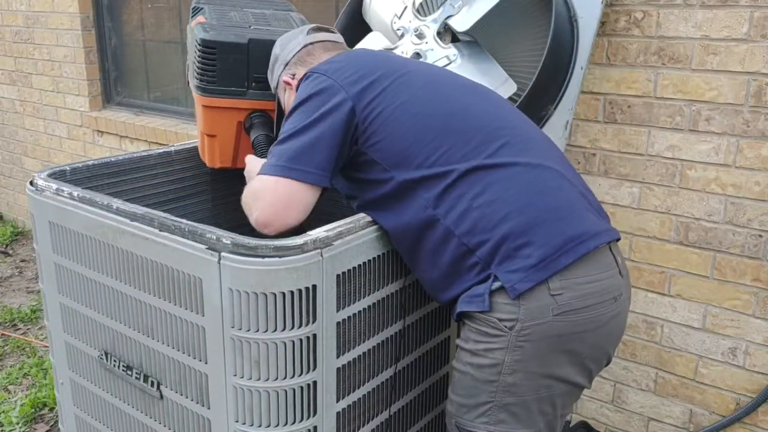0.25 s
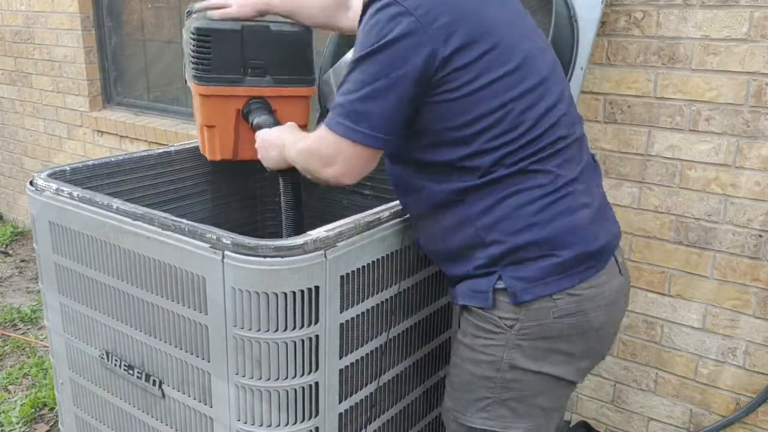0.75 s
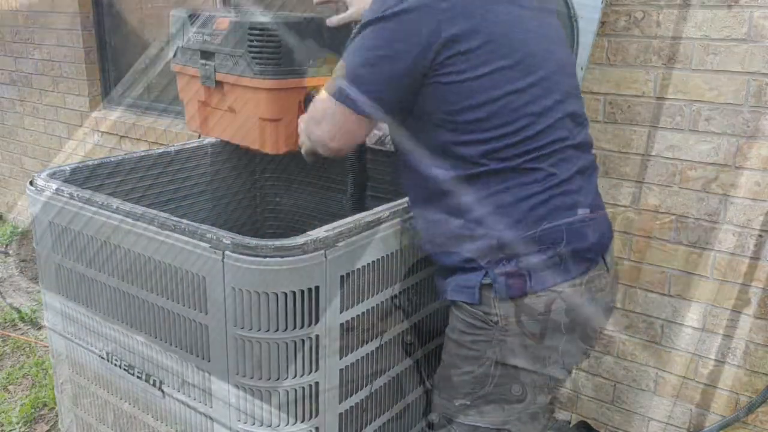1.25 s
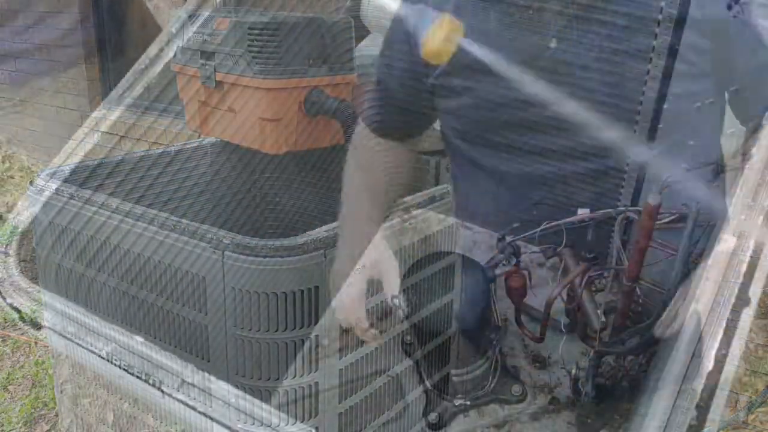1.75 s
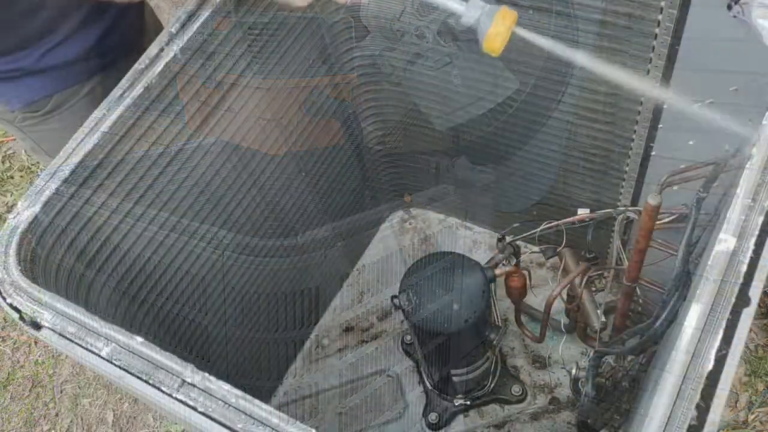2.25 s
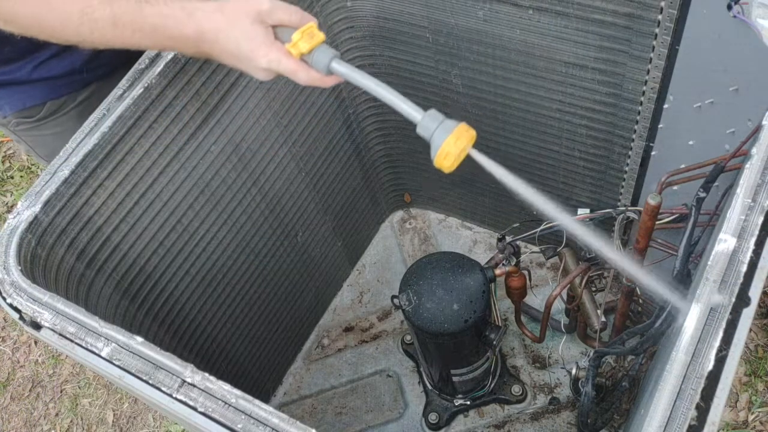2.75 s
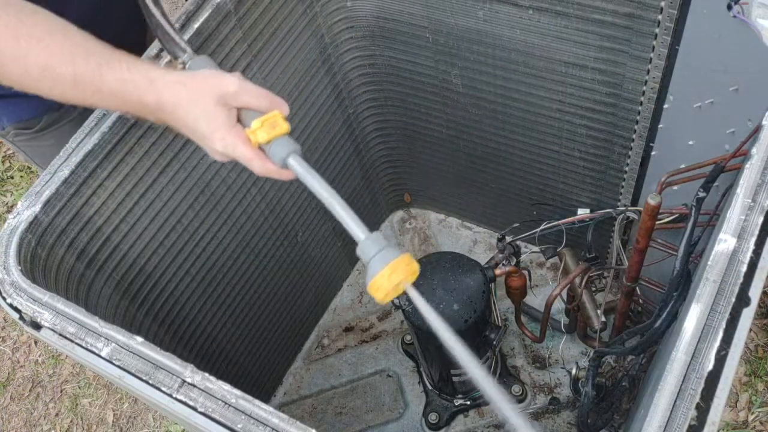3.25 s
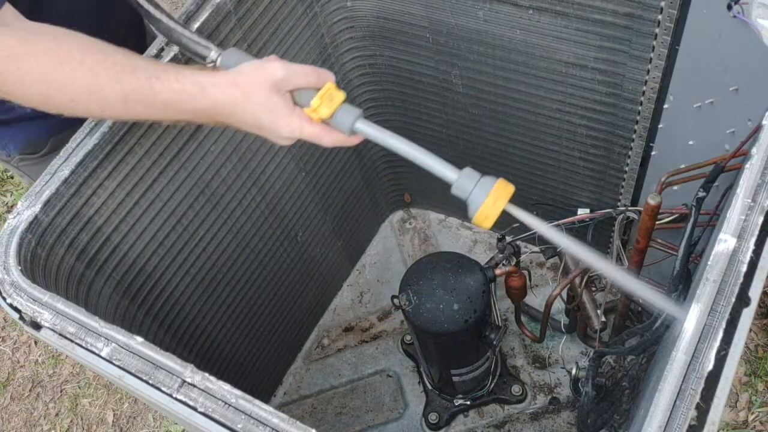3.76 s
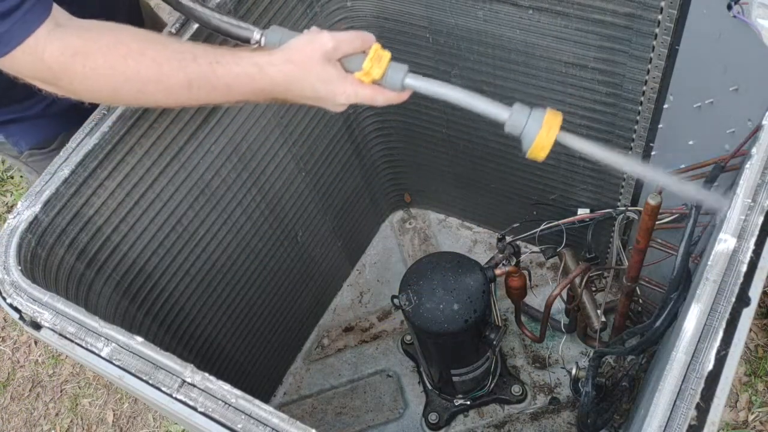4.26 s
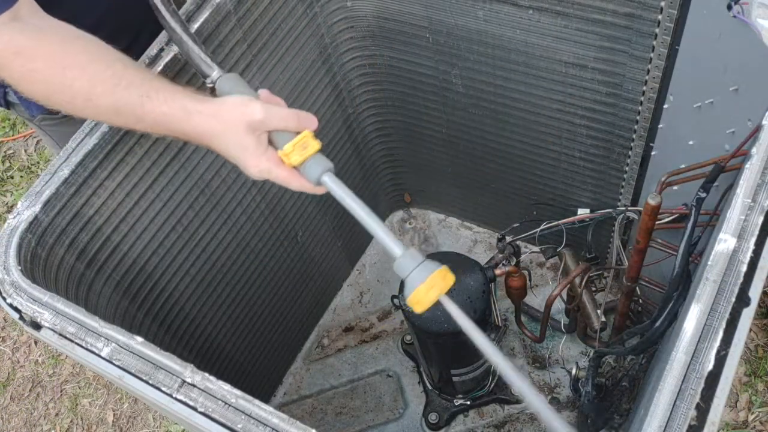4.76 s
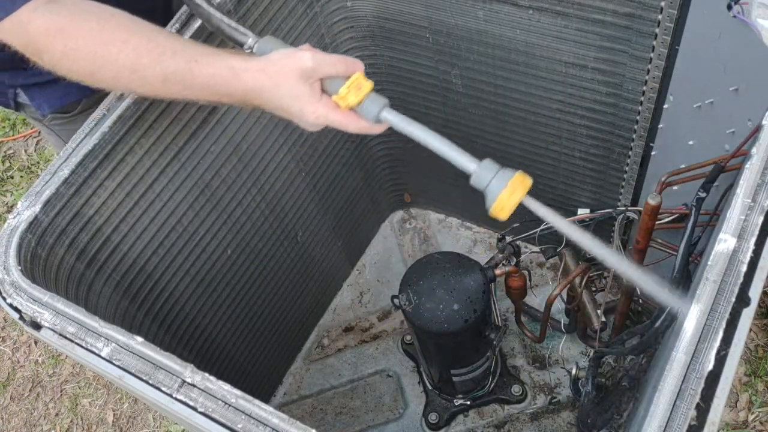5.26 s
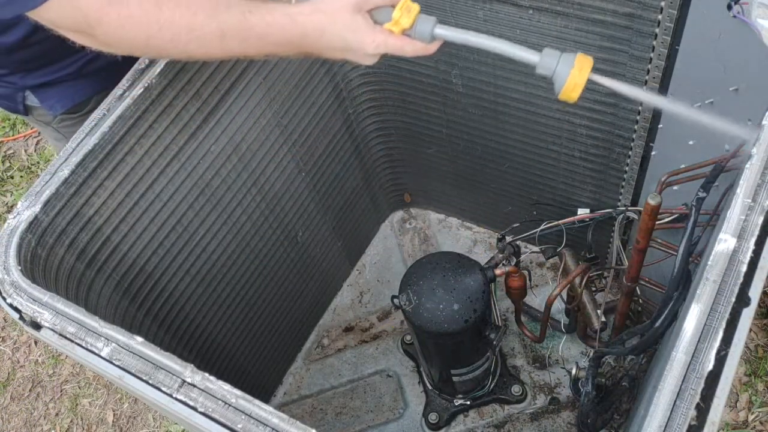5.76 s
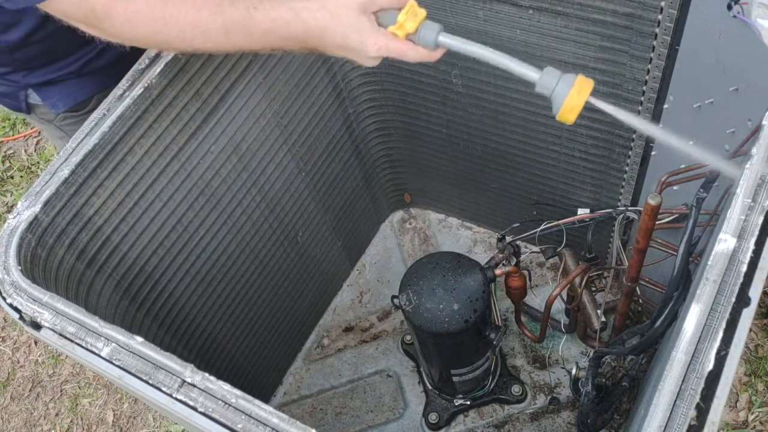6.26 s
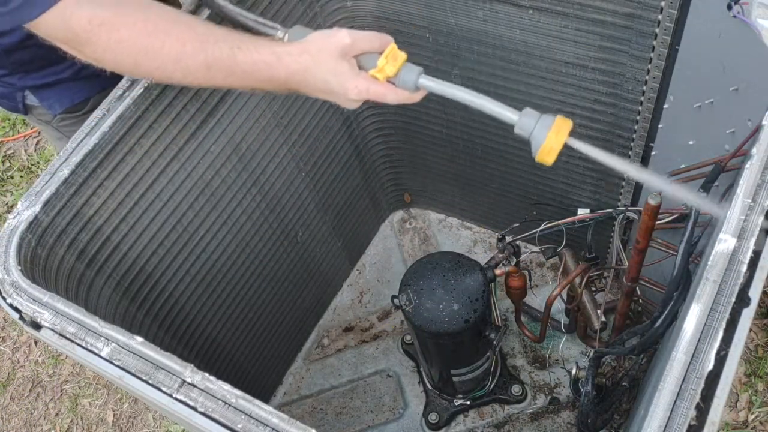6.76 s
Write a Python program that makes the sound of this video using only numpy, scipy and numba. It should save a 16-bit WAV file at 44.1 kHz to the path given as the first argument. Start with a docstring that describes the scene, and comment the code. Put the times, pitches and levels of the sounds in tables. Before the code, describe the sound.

Outdoors, a close, bright hiss of water begins abruptly as a hose jet hits an air conditioner's coil. After two short early dips, the spray runs on with gentle rises and falls, mixing fine sizzle, splatter and a light metallic ring from the fins over water pouring against the cabinet. Far behind are a faint machine hum, low traffic and two distant engines.

```python
"""A hiss of water bursts in as a hose wand sweeps its jet over an outdoor air conditioner's coil.
Thousands of drops a second patter on the coil, ring its thin metal fins and sizzle between them.
The water also splatters off the frame and drums on the cabinet; twice the jet briefly slips off.
Behind it are two distant engines, a faint machine hum and the rumble of traffic."""
import sys
import numpy as np
from scipy import signal
from scipy.fft import rfft, irfft
from scipy.io import wavfile
from scipy.ndimage import map_coordinates
from numba import njit

SR = 44100
rng = np.random.default_rng(int(sys.argv[2]) if len(sys.argv) > 2 else 0)


def waveform_to_disk(signal):
    """Save audio, clipped to [-1, 1], as 16-bit WAV at the path in sys.argv[1]."""
    frames = np.transpose(np.atleast_2d(signal))
    scaled = np.clip(frames, -1, 1) * 32767
    samples = np.round(scaled).astype(np.int16)
    wavfile.write(sys.argv[1], SR, samples)


N = 308700
T = np.arange(N) / SR
START_S, RISE_S = .563, .016  # when the sound starts, and how long it takes to come in
USUAL_AIM_DB = -31

# how squarely the sweeping jet meets the coil: (time [s], relative level [dB])
SWEEP = [(.57, -28), (.78, -26.5), (1.05, -30), (1.3, -29), (1.8, -32), (2.35, -27.5), (2.66, -26.5),
         (2.75, -29.5), (3.45, -35), (3.65, -30.5), (3.79, -33.5), (4.28, -25), (4.56, -32.5),
         (4.98, -33.5), (5.15, -35), (5.8, -33), (6.1, -30.5), (7, -30.5)]
# the jet slips off the coil: (leaves [s], fully back [s], loss [dB])
JET_MISSES = [(0.822, 1.052, 21), (1.154, 1.283, 8)]
# the jet splatters across the frame or a pipe: (time [s], half length [s], level [dB])
FRAME_HITS = [(0.773, .08, -36), (1.31, 0.083, -33.5), (1.488, 0.047, -29), (1.693, 0.079, -35.5),
              (2.29, 0.1, -34), (2.66, 0.057, -31), (3.599, 0.13, -31), (5.325, 0.19, -35.5),
              (6.674, 0.14, -35), (6.847, 0.094, -32.5)]
# the tone colours of four water sounds: (frequency [Hz], relative level [dB])
SIZZLE_COLOUR = [(100, -61), (3000, -30), (4800, -7.5), (5900, -1.5), (6900, -0.5), (7700, 1), (8500, 4),
                 (9300, -12.5), (10500, -12.5), (14000, -30)]
SPLATTER_COLOUR = [(60, -58), (700, -18.5), (1500, -9.5), (2500, 0.5), (3400, -2.5), (4300, 0), (5100, -4),
                   (6500, -5.5), (9000, -42), (15000, -35)]
MIST_COLOUR = [(6000, -19), (9000, 6), (10400, 2), (11500, -2), (13000, -10), (15500, -20.5)]
WASH_COLOUR = [(40, -52), (120, -23.5), (220, -13), (290, -3), (370, -8.5), (600, -2.5), (950, -1),
               (1500, -0.5), (2400, -8), (4000, -9.5), (9000, -26)]
# the jet rests on loose fins: (start [s], end [s], pitch [Hz], first level [dB], last level [dB])
LOOSE_PATCHES = [(0.54, 0.82, 2125, -30.5, -28), (1.05, 1.141, 2230, -32.5, -31),
                 (1.263, 1.604, 1990, -39.5, -38), (1.77, 2.3, 2056, -36.5, -38),
                 (2.3, 2.687, 2045, -33, -29), (2.93, 3.337, 1965, -35, -42),
                 (3.434, 4.1, 1994, -39, -34.5), (4.115, 4.3, 2006, -35.5, -31.5),
                 (4.51, 4.86, 1980, -32, -39.5), (4.944, 5.016, 2150, -35, -37.5),
                 (5.053, 5.144, 1860, -38, -37.5), (5.485, 5.542, 1800, -35, -35),
                 (5.773, 6.614, 1990, -41.5, -36.5), (6.66, 7, 1940, -33.5, -36)]
# the notes of the fins and the cabinet panels: (pitch [Hz], width [Hz], relative level [dB])
FIN_NOTES = [(1616, 31, 5.5), (1810, 41, 3), (1888, 16, -0.5), (1937, 20, 2), (2013, 21, -1.5),
             (2110, 32, -1.5), (2183, 37, 2), (2203, 78, 3.5), (2360, 140, 6.5), (2500, 31, 0.5)]
PANEL_NOTES = [(220, 6, -10), (257.3, 5, -2.5), (294.4, 7.5, 1), (318, 6.7, 6.5), (392.2, 8, 1),
               (429.3, 6.5, 4), (497, 29, 2.5), (596, 16, 0), (674, 17, -4), (810, 37, 1.5)]
# how hard water drums on the panels: (time [s], level compared with the pouring water [dB])
PANEL_LEVEL = [(.6, -13.5), (1.15, -6.5), (2.45, -9.5), (2.85, -11.5), (3.3, -9.5), (4.1, -16.5),
               (5.2, -10.5), (6.2, -10), (7, -16.5)]
# a dip slides through the hiss as the wand moves: (time [s], frequency [Hz], depth [0-1])
HOLLOW_PATH = [(1.6, 3700, 0.16), (1.9, 3800, 0.47), (2.3, 4600, .45), (2.5, 4500, 0), (5.4, 3400, 0.2),
               (5.7, 3480, 0.4), (6.6, 4340, 0.43), (6.8, 4630, 0.45)]
# a distant engine speeds up: (time [s], pitch [Hz], relative level [dB])
ENGINE_DRONE = [(.57, 87, -54), (1.0, 86.5, -47.5), (1.35, 87.5, -52), (1.7, 94, -48.5), (2.08, 99.5, -49),
                (2.27, 100, -66), (3.3, 101, -77), (3.9, 102, -56), (4.8, 102, -59), (6.1, 102, -57),
                (7, 102, -62)]
# a machine hums: (time [s], level [dB])
HUM_LEVEL = [(.6, -59), (1.7, -61), (2.3, -77), (7, -67)]
# how loud the traffic is: (time [s], level [dB])
TRAFFIC_LEVEL = [(.6, -56), (1.8, -55.5), (2.5, -62.5), (3.4, -57.5), (3.9, -53), (4.5, -59.5), (7, -51.5)]
# the tone colour of the traffic: (frequency [Hz], relative level [dB])
TRAFFIC_COLOUR = [(25, -42), (42, -38), (60, -18), (74, -13), (90, 1.5), (112, 5), (124, 1.5), (138, -6.5),
                  (200, -9.5), (400, -28)]
# brief whistles, bursts of misty hiss and one lingering fin:
# (time [s], half length [s], pitch [Hz], width [Hz], relative level [dB])
BRIEF_FLARES = [(0.77, 0.093, 3610, 50, -36.5), (0.816, 0.26, 805, 550, -43), (0.896, .16, 2194, 60, -47),
                (2.385, 0.18, 7600, 900, -29), (2.63, 0.26, 4340, 750, -34),
                (2.656, 0.097, 8600, 3000, -27), (2.835, .04, 8500, 3500, -28),
                (2.8, .25, 11400, 3500, -42), (2.85, 0.23, 9400, 650, -37), (4.02, 0.15, 7760, 1200, -28.5),
                (4.077, 0.41, 4380, 400, -45), (4.14, 0.13, 10600, 450, -41), (4.28, 0.16, 9170, 1410, -28),
                (4.33, 0.1, 13200, 3000, -41), (4.964, .22, 6280, 500, -35.5),
                (5.394, 0.083, 1160, 550, -37), (5.333, 0.23, 3400, 900, -39.5),
                (5.7, 0.13, 1280, 300, -42), (6.45, 0.41, 2600, 700, -39.5), (6.91, 0.094, 10450, 500, -38)]
# a second engine goes by far off: (time [s], pitch [Hz], level [dB])
PASSING_DRONE = [(5.1, 101, -94), (5.6, 98.7, -60.5), (6.2, 96.1, -49.5), (6.6, 95.8, -53.5),
                 (7, 95.6, -66)]


def undb(db):
    """Turn decibels into a number to multiply by."""
    return 10 ** (np.asarray(db) / 20)


def unit(x):
    """Scale x to an average strength (rms) of 1."""
    return x / np.sqrt(np.mean(x ** 2))


def curves(table):
    """Join each column of a timed table with straight lines."""
    times, *columns = np.transpose(table)
    return [np.interp(T, times, column) for column in columns]


def wander(rate):
    """A smooth random wobble of strength 1 that changes about rate times a second."""
    points = rng.standard_normal(1024)
    times = T[::32]
    smooth = map_coordinates(points, [times * rate], order=2, mode="wrap")
    return unit(np.interp(T, times, smooth))


def colour(x, spectrum):
    """Give x the tone colour in a table, at strength 1."""
    hz, db = np.transpose(spectrum)
    bin_hz = np.maximum(np.arange(N // 2 + 1) * SR / N, 1)
    gain = undb(np.interp(np.log(bin_hz), np.log(hz), db))
    return unit(irfft(rfft(x) * gain, N))


@njit
def band_pass(x, hz, width):
    """Keep a band of frequencies around hz, which may move."""
    y, band, low = np.empty(len(x)), 0., 0.
    for i in range(len(x)):
        tuning, damping = np.tan(np.pi * hz[i] / SR), width / hz[i]
        swing = (band + tuning * (x[i] - low)) / (1 + tuning * (tuning + damping))
        band, low = 2 * swing - band, low + 2 * tuning * swing
        y[i] = damping * swing
    return y


def resonate(x, hz, width):
    """Let x ring one note, at strength 1; a narrow width rings longer."""
    return unit(band_pass(x, hz * np.ones(N), float(width)))


def drops(per_second, scatter_db):
    """Drops land at random moments, a few much harder than the rest."""
    lands = rng.random(N) < per_second / SR
    return unit(lands * rng.standard_normal(N) * undb(scatter_db * rng.standard_normal(N)))


def jet_force(shake_start_s=5.82, shake_period_s=0.193, shake_db=2.5, unsteady_db=0.44):
    """The jet's force in dB above the usual: a slow sweep, a wrist shake and an unsteady hand."""
    sweep_db, = curves(SWEEP)
    turns = (T - shake_start_s) / shake_period_s
    shake = -np.cos(2 * np.pi * turns) * np.clip(2 * turns + 1, 0, 1)
    return sweep_db - USUAL_AIM_DB + shake_db * shake + unsteady_db * wander(10)


def miss_loss(fade_s, return_s=0.052):
    """The dB lost when the jet slips off: a sound falls 20 dB per fade_s, then returns with the jet."""
    loss = np.zeros(N)
    for leaves, back, depth_db in JET_MISSES:
        falling = 20 * (T - leaves) / fade_s
        returning = depth_db * (back - T) / return_s
        loss += np.clip(np.minimum(falling, returning), 0, depth_db)
    return loss


def sizzle(force_db, usual_hz=7530, hz_per_db=40, broad_db=-2):
    """Drops burst between the fins; a stronger jet sizzles louder and higher."""
    hz = usual_hz + hz_per_db * force_db
    narrow = resonate(resonate(drops(20000, 1.0), hz, width=1250), hz, width=3700)
    broad = colour(drops(20000, 1.1), SIZZLE_COLOUR) * undb(broad_db)
    level_db = USUAL_AIM_DB + force_db + 0.77 + 0.53 * wander(45)
    return unit(narrow + broad) * undb(level_db)


def fin_patches(attack_s=0.024, fade_s=0.079, stiff_hz=1980, stiff_db=-44.5):
    """Level and pitch of the fins: loose patches ring out, stiff fins weakly; the loudest sets pitch."""
    power = undb(stiff_db - 0.9 * miss_loss(fade_s)) ** 2
    weighted_hz = power * stiff_hz
    for start, end, hz, first_db, last_db in LOOSE_PATCHES:
        held_db = np.interp(T, [start, end], [first_db, last_db])
        faded_db = 20 * np.maximum(T - end, 0) / fade_s
        gain = np.clip((T - start) / attack_s, 0, 1) * undb(held_db - faded_db)
        power += gain ** 2
        weighted_hz += hz * gain ** 2
    return np.sqrt(power), weighted_hz / power


def fins(flutter_db=0.3, rattle_db=-10, hop_db=0.56):
    """Drops ring the fins; the jet hops from fin to fin, so each note flutters in level."""
    gain, patch_hz = fin_patches()
    ring = unit(sum(resonate(drops(6000, 3.3), hz, width) * undb(db + flutter_db * wander(35))
                    for hz, width, db in FIN_NOTES))
    rattle = resonate(drops(5000, 1.1), patch_hz, width=440) * undb(rattle_db)
    # only the fins under the jet sound strongly
    return resonate(ring + rattle, patch_hz, width=190) * gain * undb(hop_db * wander(12))


def spray(force_db, clump_db=0.65):
    """The jet breaks into clumps of drops that sizzle, ring the fins and splatter off the frame."""
    clumps = undb(clump_db * wander(90))
    on_coil = undb(-38 + 0.52 * force_db)
    on_frame = sum(undb(db) * swell(time, half_length) for time, half_length, db in FRAME_HITS)
    sizzling = sizzle(force_db)
    splatter = colour(drops(14000, 1.1), SPLATTER_COLOUR) * np.hypot(on_coil, on_frame)
    mist = colour(drops(25000, 2.8), MIST_COLOUR) * undb(-43.5 + 0.81 * force_db)
    hiss = (sizzling + splatter + mist) * undb(-miss_loss(fade_s=0.053))
    return (hiss + fins()) * clumps


def wash(force_db, swirl_db=1.43, drain_s=0.26, first_rush_db=2.0, settle_s=1.):
    """Water pours through the coil and drums on the cabinet; it drains slowly when the jet leaves."""
    rush_db = first_rush_db * np.exp((START_S - T) / settle_s)
    level_db = -40.5 + 0.11 * force_db + rush_db - miss_loss(drain_s)
    panel_db, = curves(PANEL_LEVEL)
    pour = colour(drops(12000, 2.2), WASH_COLOUR) * undb(swirl_db * wander(30))
    panels = sum(undb(db) * resonate(drops(3000, 3.4), hz, width) for hz, width, db in PANEL_NOTES)
    # open sheet metal gives off almost no deep bass
    panels = signal.sosfilt(signal.butter(4, 190, "high", fs=SR, output="sos"), panels)
    return (pour + unit(panels) * undb(panel_db)) * undb(level_db)


def hollow(x, width_hz=1100.):
    """The hiss and its reflection partly cancel in one moving band."""
    hz, depth = curves(HOLLOW_PATH)
    return x - depth * band_pass(x, hz, width_hz)


def shimmer(x, depth_db=1.2, count=30):
    """The jet keeps meeting new fins and gaps, so each band of the hiss rises and falls on its own."""
    bin_hz = np.arange(N // 2 + 1) * SR / N
    band_number = np.interp(bin_hz, [0, SR / 12, SR / 4], [0, count / 2, count - 1])
    spectrum = rfft(x)
    bands = (irfft(spectrum * np.maximum(1 - np.abs(band_number - k), 0), N) for k in range(count))
    return sum(band * undb(depth_db * wander(9)) for band in bands)


def far_tone(hz, waver_db):
    """A far-off tone whose level wavers on the way."""
    phase = 2 * np.pi * np.cumsum(hz * np.ones(N)) / SR
    return unit(np.sin(phase) * undb(waver_db * wander(6.1)))


def street(hum_hz=122):
    """A distant engine speeds up over a machine's hum and the rumble of traffic."""
    hz, db = curves(ENGINE_DRONE)
    engine = far_tone(hz, 2.8) * undb(db - 1)
    undertone = far_tone(0.64 * hz, 1.2) * undb(-68)
    hum = far_tone(hum_hz, 0.57) * undb(curves(HUM_LEVEL)[0])
    traffic = colour(rng.standard_normal(N), TRAFFIC_COLOUR) * undb(curves(TRAFFIC_LEVEL)[0])
    return engine + undertone + hum + traffic


def swell(time, half_length):
    """A smooth rise and fall around one moment."""
    return np.cos(np.pi / 2 * np.clip((T - time) / half_length, -1, 1)) ** 2


def flares(gain_db=-2):
    """Brief whistles, wide bursts of misty hiss, and one fin ringing on after the jet leaves."""
    patter = drops(12000, 4.5)
    sound = np.zeros(N)
    for time, half_length, hz, width, db in BRIEF_FLARES:
        band = resonate(resonate(patter, hz, width), hz, 2 * width)
        sound += band * swell(time, half_length) * undb(db + gain_db)
    return sound


def passing_engine(octave_db=-4):
    """Near the end a second engine goes by far off, its pitch sinking."""
    hz, db = curves(PASSING_DRONE)
    return (far_tone(hz, 3.2) + undb(octave_db) * far_tone(2 * hz, 0.69)) * undb(db)


def scene():
    """Water on the coil and the street behind it, the same in both ears."""
    force_db = jet_force()
    water = shimmer(hollow(spray(force_db) + wash(force_db))) + flares()
    return np.tile(water + street() + passing_engine(), (2, 1))


def record(dry, top_hz=15550):
    """The sound starts suddenly out of silence; the highest treble is cut off."""
    opening = np.clip((T - START_S) / RISE_S, 0, 1)
    lowpass = signal.ellip(10, .1, 80, top_hz, fs=SR, output="sos")
    return signal.sosfilt(lowpass, dry * opening)


dry = scene()
out = record(dry)
waveform_to_disk(out)
```